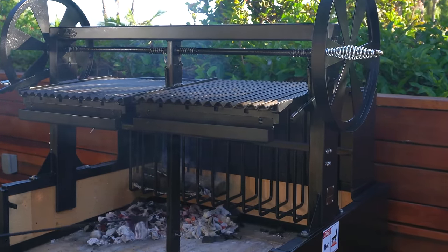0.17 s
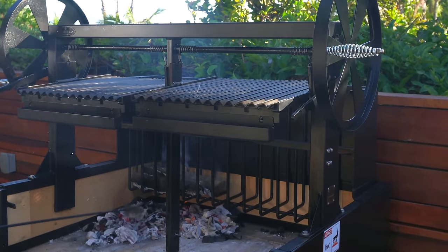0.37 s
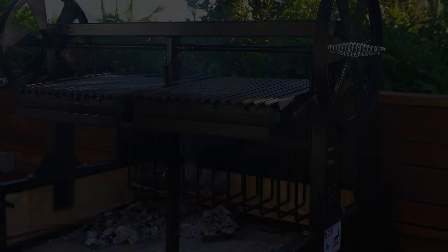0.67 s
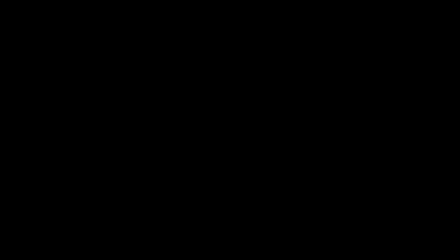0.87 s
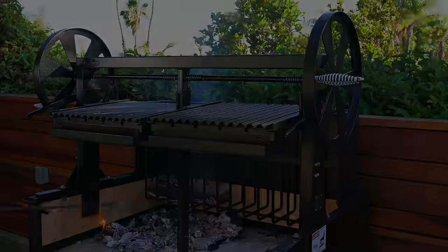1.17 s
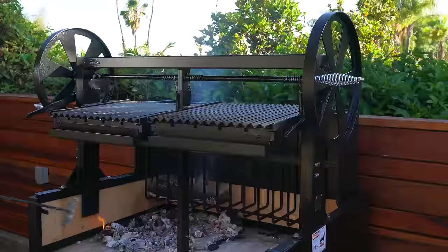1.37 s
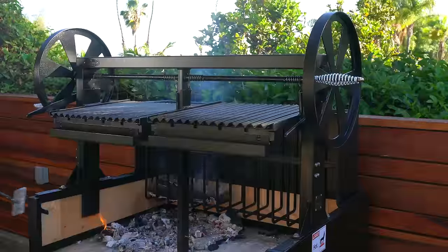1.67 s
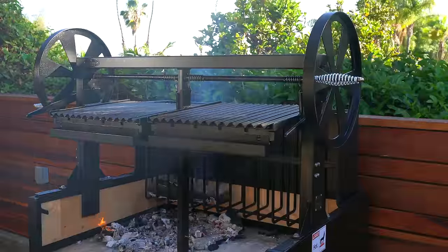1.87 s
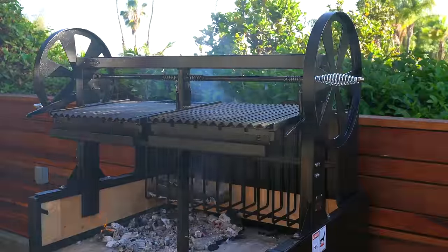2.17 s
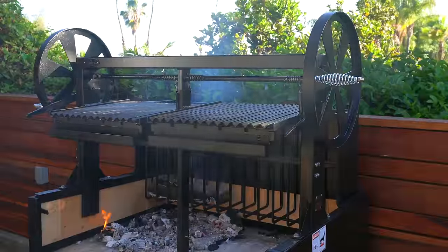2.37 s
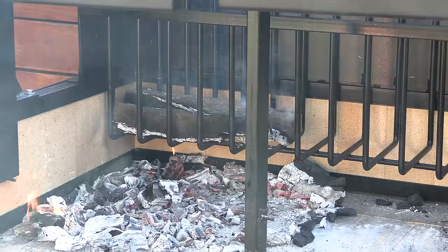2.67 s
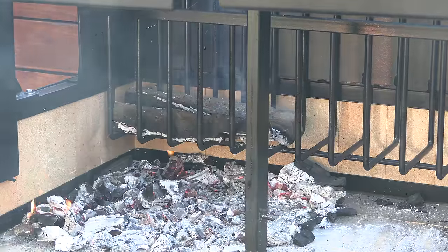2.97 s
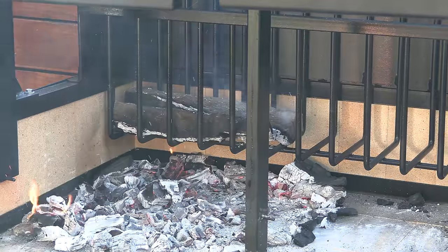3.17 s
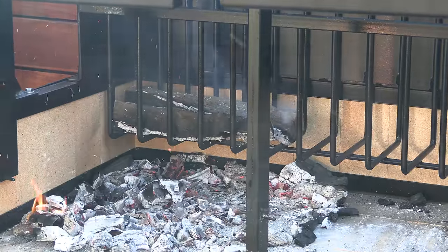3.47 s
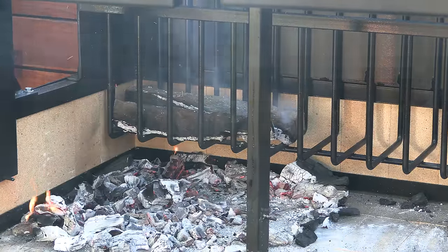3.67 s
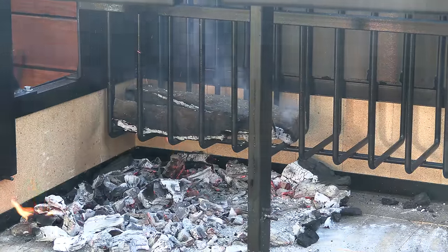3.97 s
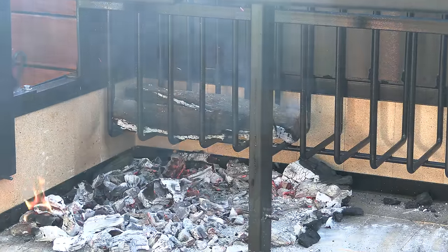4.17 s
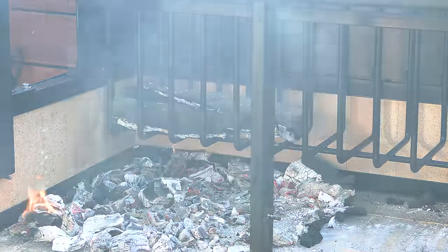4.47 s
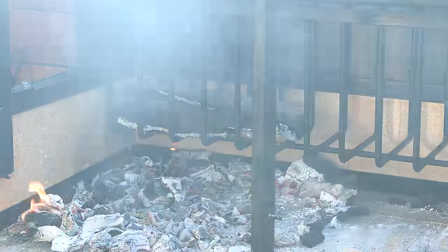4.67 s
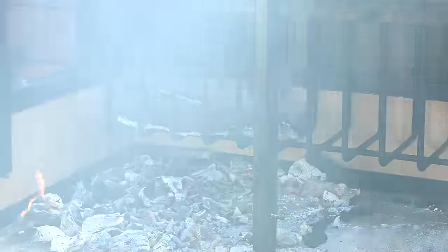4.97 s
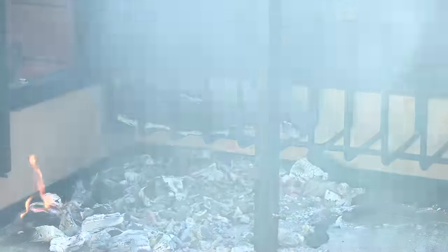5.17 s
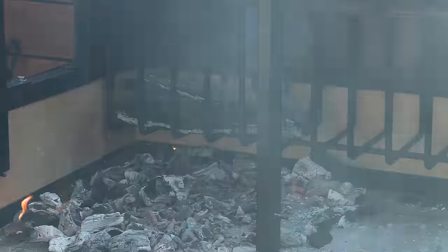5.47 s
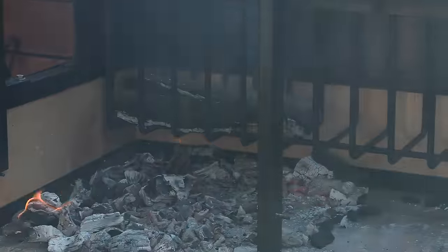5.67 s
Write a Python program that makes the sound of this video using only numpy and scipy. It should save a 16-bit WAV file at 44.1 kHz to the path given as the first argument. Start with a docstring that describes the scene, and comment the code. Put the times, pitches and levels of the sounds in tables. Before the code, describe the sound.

Embers crackle over a quiet outdoor rush and faint low hum. Within the first second a rake grinds through coals, clinks and thuds on sheet steel. A calmer stretch of snaps follows, then low wind puffs, a crunch and the loudest boomy metal clatter with short squeaks. Gas hisses softly, embers pop sharply, and steel knocks again near the end. Close microphone, short patio reflections.

```python
"""Raking a charcoal grill

A metal rake is drawn through burning lump charcoal in an outdoor steel grill: decaying modes clink and knock.
Shaped random clicks make the grinding coals, sizzle and sputter; noise bursts make the snapping embers.
Low noise swells buffet the microphone as a gust; band noise gives a rush and faint hum, gliding sines a far bird."""
import sys
import numpy as np
from scipy import signal
from scipy.fft import rfft, irfft
from scipy.io import wavfile

SR = 44100
rng = np.random.default_rng(int(sys.argv[2]) if len(sys.argv) > 2 else 0)


def dump_mix(stems):
    """Bounce the given channels to the path in sys.argv[1] as a 16-bit WAV at rate SR."""
    frames = np.atleast_2d(stems).T  # one column per channel
    limited = np.clip(frames, -1, 1)  # hard clip at full scale
    pcm = np.round(limited * 32767).astype(np.int16)
    wavfile.write(sys.argv[1], SR, pcm)


N = 256220
TIME = np.arange(N) / SR
TAIL = TIME[:int(.8 * SR)]   # time axis of one decaying sound
EDGES = 22 * 2 ** (np.arange(20) / 2)   # half-octave band edges, Hz
CENTRES = np.sqrt(EDGES[1:] * EDGES[:-1])

# modes of the grill's bars: mode_hz [Hz], level_db [dB, relative], t60_s [s, before the length factor]
BAR_MODES = [(1200, -2.5, 0.22), (1376, 5, 0.094), (2233, 2, 0.073), (2450, -14, 0.24), (2900, -8, 0.45),
             (2940, 2, 0.12), (3590, -3.5, 0.44), (4230, -18, .25), (4340, -5, 0.31), (4970, -21, 0.57),
             (5080, -8, 0.65), (6060, 1, 0.14), (6210, -16, 0.4), (6950, -9, 0.22), (7420, -15, 0.33),
             (7870, -14, 0.16), (9000, -3, 0.1), (9512, -11, 0.19), (11820, -3.5, 0.085)]


def from_db(db):
    """Decibels to gain."""
    return 10 ** (np.asarray(db) / 20)


def rms_one(x):
    """Scale to unit rms."""
    return x / np.sqrt(np.mean(x ** 2) + 1e-20)


def in_time(rows):
    """Interpolate each column of a breakpoint curve at every sample."""
    s, *columns = np.transpose(rows)
    return [np.interp(TIME, s, column) for column in columns]


def at_hz(points, hz):
    """Read a table on a log-frequency axis."""
    known, value = np.transpose(points)
    return np.interp(np.log(hz), np.log(known), value)


def add(out, s, sound):
    """Mix a sound in at time s."""
    at = max(round(s * SR), 0)
    out[at:at + len(sound)] += sound[:N - at]


def butter(x, hz, kind, order=2):
    """Causal Butterworth filter."""
    sos = signal.butter(order, np.minimum(hz, .48 * SR), kind, fs=SR, output="sos")
    return signal.sosfilt(sos, x + 1e-18)


def drift(rate):
    """Random wander of unit rms, with rate new values per second joined by lines."""
    knots = rng.standard_normal(2048)
    return rms_one(np.interp(TIME * rate, np.arange(len(knots)), knots))


def bands(x):
    """Split into half-octave bands, each of rms 1."""
    return np.array([rms_one(butter(x, [low, high], "band")) for low, high in zip(EDGES, EDGES[1:])])


def coloured(x, spectrum):
    """Filter by a curve of (Hz, dB) that falls away beyond its ends; rms 1."""
    hz = np.maximum(np.fft.rfftfreq(N, 1 / SR), 1)
    low_end = 1 + (spectrum[0][0] / 2 / hz) ** 4
    high_end = 1 + (hz / spectrum[-1][0] / 2) ** 4
    gain = from_db(at_hz(spectrum, hz)) / np.sqrt(low_end * high_end)
    return rms_one(irfft(rfft(x) * gain, N))


def grains(per_s, spread_db):
    """Random clicks of either sign, many small and a few large; rms 1."""
    sizes_db = spread_db * np.minimum(rng.exponential(1, N), 4)
    sizes = from_db(sizes_db) * rng.choice([-1, 1], N)
    return rms_one(sizes * (rng.random(N) < per_s / SR))


def dying(t60):
    """Envelopes that fall 60 dB in t60 seconds, one row each."""
    return np.exp(-np.log(1000) * TAIL / np.reshape(t60, (-1, 1)))


def sines(hz):
    """Unit sines of random phase, one row each."""
    return np.sin(2 * np.pi * (np.outer(hz, TAIL) + rng.random((len(hz), 1))))


def swells(rows, attack_s, t60):
    """Gain over time: each (start s, hold s, dB) rises, holds and dies away."""
    total = 0
    for s, hold, db, *_ in rows:
        fall_db = 60 * np.maximum(TIME - s - attack_s - hold, 0) / t60
        total = total + from_db(db - fall_db) * np.clip((TIME - s) / attack_s, 0, 1)
    return total


def strike(modes, level_db, tilt_db=0, vary_db=4.5, length=1):
    """Ring a metal part as dying modes; each touch weights them a little differently."""
    hz, mode_db, t60 = np.transpose(modes)
    tilt = tilt_db * np.log2(hz / np.median(hz))
    gain = from_db(level_db + mode_db + tilt + vary_db * rng.standard_normal(len(hz)))
    return gain @ (sines(hz) * dying(length * t60))


def warble(notes, waver, waver_rate):
    """Short gliding notes whose pitch wavers fast."""
    out = np.zeros(N)
    for s, length, start_hz, end_hz, level_db in notes:
        count = int(length * SR)
        pitch = np.linspace(start_hz, end_hz, count) * (1 + waver * drift(waver_rate)[:count])
        tone = np.sqrt(2) * np.sin(2 * np.pi * np.cumsum(pitch) / SR)
        add(out, s, from_db(level_db) * np.hanning(count) * tone)
    return out


def scatter(x, early_db, early_t60, late_db, late_t60):
    """Close walls scatter each sound from 2 ms on; the patio adds a longer tail, both of dying noise."""
    early, late = rng.standard_normal((2, len(TAIL))) * dying([early_t60, late_t60]) * (TAIL > .002)
    early_echo = from_db(early_db) * early / np.linalg.norm(early)
    late_echo = from_db(late_db) * late / np.linalg.norm(late)
    return x + signal.fftconvolve(x, early_echo + late_echo)[:N]


def dips(x, rows):
    """Carve broad shallow dips by taking away part of a band."""
    for hz, width_hz, depth_db in rows:
        edges = [max(hz - width_hz / 2, 20), hz + width_hz / 2]
        x = x - (1 - from_db(depth_db)) * butter(x, edges, "band", order=1)
    return x


def outdoors(hum_width_hz=9):
    """A distant rush of shaped noise that barely drifts, with a wavering low hum of narrow noise bands."""
    # rush spectrum: band_hz [Hz], density_db [dB per Hz, relative]
    air_colour = [(28, -1.5), (45, -3), (80, -0.5), (115, -2), (168, -7.5), (240, -8.5), (330, -11.5),
                  (550, -13), (740, -11), (1100, -18.5), (1700, -26.5), (2900, -36.5), (3600, -40),
                  (6000, -45)]
    # hum bands: centre_hz [Hz], level_db [dB, relative]
    hum_bands = [(68, -26), (113, -4.5)]
    # hum level: time_s [s], level_db [dB]
    hum_level = [(0, -59), (1.3, -56.5), (2.2, -61.5), (2.6, -52.5), (3.0, -51.5), (4.2, -79), (5.8, -60)]
    air = from_db(-49.5 + .5 * drift(4.29)) * coloured(rng.standard_normal(N), air_colour)
    hum = np.zeros(N)
    for hz, db in hum_bands:
        edges = [hz - hum_width_hz / 2, hz + hum_width_hz / 2]
        hum += from_db(db) * rms_one(butter(rng.standard_normal(N), edges, "band", order=1))
    return air + from_db(in_time(hum_level)[0]) * rms_one(hum)


def bird(call_db=2, note_s=0.055, pitch_drop=0.046):
    """Far, buzzy notes: each falls by a share of its pitch, wavers fast, and is blurred by the garden."""
    # notes: start_s [s], pitch_hz [Hz, before the fall and waver], level_db [dB, before the call gain]
    chirps = [(1.896, 2810, -67.5), (2.09, 4270, -67), (2.139, 3630, -67.5), (2.945, 4220, -71),
              (2.994, 3720, -71), (4.102, 4150, -73), (4.129, 3460, -65)]
    notes = [(s, note_s, hz, hz * (1 - pitch_drop), db) for s, hz, db in chirps]
    call = warble(notes, waver=0.047, waver_rate=248)
    return from_db(call_db) * scatter(call, early_db=-9, early_t60=0.041, late_db=1.5, late_t60=0.21)


def gust(lowest_hz=42, attack_s=0.023, t60=0.17):
    """Eddies at the microphone port, puff by puff: low noise whose upper edge moves with each puff."""
    # puffs of wind: start_s [s], hold_s [s], level_db [dB], upper_edge_hz [Hz]
    puffs = [(2.949, .01, -37, 188), (3.022, 0.049, -32, 126), (3.124, 0.053, -36.5, 158),
             (3.228, 0.009, -35.5, 175), (3.325, 0.04, -32.5, 120), (3.396, 0.019, -31.5, 120),
             (3.429, 0.017, -36.5, 210)]
    edge_hz, = in_time([(s + attack_s + hold / 2, hz) for s, hold, _, hz in puffs])
    low = CENTRES[:10, None]
    weights = 1 / np.sqrt((1 + (low / edge_hz) ** 9) * (1 + (lowest_hz / low) ** 6))
    eddies = (weights * bands(rng.standard_normal(N))[:10]).sum(axis=0)
    eddies = eddies / np.linalg.norm(weights, axis=0)   # level stays even as the edge moves
    return swells(puffs, attack_s, t60) * rms_one(eddies)


def sizzle(hiss_db=-4, ticks_db=-5):
    """The glowing bed hisses in dense fine clicks and ticks in sparse ones."""
    # sizzle level: time_s [s], level_db [dB]
    bed_level = [(0, -63.5), (1.1, -65), (1.65, -65.5), (2.1, -66.5), (2.65, -74.5), (3.7, -66), (4.7, -68),
                 (5.05, -59), (5.3, -68.5), (5.8, -65.5)]
    # sizzle spectrum: band_hz [Hz], density_db [dB per Hz, relative]
    bed_colour = [(1500, 3.5), (3000, 0.5), (5000, -3), (8000, -4), (12500, 0), (16000, 1.5)]
    hiss = from_db(hiss_db) * grains(per_s=11000, spread_db=5.0)
    ticks = from_db(ticks_db) * grains(per_s=110, spread_db=3.5)
    return from_db(in_time(bed_level)[0]) * coloured(hiss + ticks, bed_colour)


def sputter(seep_db=-77):
    """Jets of gas spit finely out of the wood in the middle treble, over a faint steady seep."""
    # jets: start_s [s], hold_s [s], level_db [dB]
    jets = [(2.8, 0.062, -60.5), (4.41, 0.13, -62), (4.92, 0.039, -59)]
    # spitting spectrum: band_hz [Hz], density_db [dB per Hz, relative]
    spit_colour = [(1500, 6), (2150, 3), (2900, -3), (4100, -6), (5200, -8), (8000, -10)]
    flow = from_db(seep_db) + swells(jets, attack_s=0.011, t60=.7)
    return flow * coloured(grains(per_s=5400, spread_db=3.0), spit_colour)


def snaps(crack_db=-2, top_gain_db=2.5, body_gain_db=2, linger_db=-17, linger=5, build_s=0.00084):
    """An ember splits: one sharp crack, a short spray of splinters, and a faint lingering fizz."""
    # louder embers: start_s [s], splinter_db and woody_body_db [dB, before the gains],
    # t60_s [s, before the fast and slow factors]
    embers = [(0.169, -42.5, -51, 0.06), (0.2199, -45, -64, 0.039), (0.336, -45, -57, .025),
              (0.3994, -51.5, -60, 0.054), (0.4535, -53, -59, .03), (0.5084, -40, -49, 0.028),
              (0.6, -57, -74, .04), (0.9004, -52, -68, .022), (1.0024, -53, -60, .027),
              (1.2293, -48.5, -50, 0.042), (1.3019, -51, -60, 0.026), (1.3858, -63, -51, 0.017),
              (1.515, -48, -62, 0.018), (1.5462, -43, -46, .02), (1.7521, -43, -50.5, 0.072),
              (1.844, -53.5, -58.5, 0.073), (1.8956, -56, -53, 0.027), (2.188, -55.5, -73, .04),
              (2.3572, -52, -61, 0.066), (2.4754, -59, -77, .035), (2.5638, -58.5, -75, .04),
              (2.671, -57.5, -62, .04), (2.811, -64, -63, 0.091), (3.0838, -58.5, -63, 0.16),
              (3.3447, -50, -57, 0.062), (3.409, -55, -56, 0.22), (3.5914, -46, -47.5, 0.084),
              (4.027, -56.5, -72, 0.12), (4.175, -53.5, -71, 0.071), (4.2587, -51.5, -56.5, 0.055),
              (4.4221, -54, -48, 0.039), (4.619, -53, -63, 0.06), (4.819, -44, -52, 0.044),
              (4.9194, -46.5, -55, 0.032), (5.01, -63, -42.5, 0.023), (5.1033, -47, -57, 0.036),
              (5.151, -47, -54, 0.023), (5.2036, -38, -49, 0.064), (5.463, -55, -70, .035),
              (5.5199, -53.5, -65, .04), (5.6058, -54.5, -55.5, 0.043), (5.7908, -46, -70, 0.022)]
    crack, top, body = np.zeros((3, N))
    for s, top_db, body_db, t60 in embers:
        fast, slow = dying(max(t60, .01) * np.array([.7, linger]))
        spray = (fast + from_db(linger_db) * slow) * np.minimum(TAIL / build_s, 1)
        add(crack, s, from_db(max(top_db, body_db) + crack_db) * dying(.007)[0])
        add(top, s, from_db(top_db + top_gain_db) * spray)
        add(body, s, from_db(body_db + body_gain_db) * spray)
    splinter_colour = [(4000, -4.5), (8000, -0.5), (12500, 4), (16000, 1), (20000, -25)]
    fibre_colour = [(1000, 7.5), (2000, 2.0), (4200, 7.0), (7000, -4), (12000, -17)]
    splinters = coloured(rng.standard_normal(N), splinter_colour)
    fibres = coloured(rng.standard_normal(N), fibre_colour)
    bright = butter(crack * rng.standard_normal(N) + top * splinters, 1500, "high")
    return bright + body * fibres


def coals(lump_t60=0.045, clink_db=-3):
    """Brittle lumps grind and clink under the rake, or settle with a short crunch."""
    # strokes through the coals: start_s [s], hold_s [s], level_db [dB]
    drag_strokes = [(0.125, .01, -54), (0.17, 0.034, -45), (0.255, 0.012, -49.5)]
    # grinding spectrum: band_hz [Hz], density_db [dB per Hz, relative]
    drag_colour = [(150, -6), (350, 6.5), (700, -7.5), (1500, -3), (2600, -14), (4000, -6), (8000, -14.5),
                   (14000, -10.5)]
    # lumps that shift and settle: start_s [s], level_db [dB]
    settling_lumps = [(0.22, -38.5), (0.264, -44), (0.346, -41.5), (1.752, -45), (1.894, -41.5),
                      (3.353, -30.5), (5.202, -34.5)]
    # crunch spectrum: band_hz [Hz], density_db [dB per Hz, relative]
    crunch_colour = [(150, 6.5), (450, 0.5), (800, -7), (1400, -8.5), (2200, -6.5), (5000, -39),
                     (14000, -18)]
    pitches = np.geomspace(450, 4500, num=10)
    clinking = np.zeros(N)
    # each size of lump has its own pitch and falls 60 dB in 25 cycles
    for ring in sines(pitches) * dying(25 / pitches):
        clinking += signal.fftconvolve(grains(per_s=88, spread_db=6.5), ring)[:N]
    grit = grains(per_s=2200, spread_db=1.0)
    grinding = coloured(grit + from_db(clink_db) * rms_one(clinking), drag_colour)
    drag = swells(drag_strokes, attack_s=0.0061, t60=0.49) * grinding
    settling = np.zeros(N)
    for s, level_db in settling_lumps:
        add(settling, s, from_db(level_db) * dying(lump_t60)[0])
    return drag + settling * coloured(grains(per_s=18000, spread_db=4.5), crunch_colour)


def skid(grit_db=-7):
    """Many tiny slips excite the bars, which the pressing rake damps."""
    # skids along the bars: start_s [s], hold_s [s], level_db [dB]
    skid_strokes = [(3.606, 0.013, -43.5), (3.748, 0.043, -39.5), (3.818, 0.011, -41.5)]
    # skid filter: band_hz [Hz], gain_db [dB, relative]
    skid_colour = [(1000, 7.5), (1300, -5), (2300, 2), (3500, -8), (6000, -5), (9000, -10.5), (13000, -14)]
    slips = grains(per_s=770, spread_db=2.0)
    ringing = rms_one(signal.fftconvolve(slips, strike(BAR_MODES, 0, length=0.12))[:N])
    scrape = coloured(ringing + from_db(grit_db) * slips, skid_colour)
    return swells(skid_strokes, attack_s=0.0072, t60=0.25) * scrape


def squeaks():
    """Steel sticks and slips in short squeaks, made as gliding tones of unsteady pitch."""
    # squeaks: start_s [s], length_s [s], start_hz and end_hz [Hz, before the waver], level_db [dB]
    slips = [(3.812, .02, 4120, 3970, -44), (3.828, 0.046, 2480, 2370, -48),
             (3.895, 0.035, 2355, 2370, -47.5), (3.935, 0.03, 2420, 2430, -60)]
    return warble(slips, waver=0.076, waver_rate=350)


def clinks(landed_t60=.06):
    """Head, tine and shaft of the rake, and the bars that it touches, ring in their own modes."""
    # rake head touches: start_s [s], head_db [dB], tilt_db [dB per octave],
    # tine_db [dB, the long-ringing tine], length [factor on the head's t60]
    head_hits = [(0.259, -55, 0, -78, 0.63), (0.322, -53.5, -5, -78, 1), (0.669, -41.5, -2, -50, 0.6),
                 (0.686, -47, 3.5, -40.5, 0.52), (0.92, -43.5, 0, -80, 0.44), (1.17, -52.5, -2.5, -71, .75)]
    # head modes: mode_hz [Hz], level_db [dB, relative], t60_s [s, before the length factor]
    head_modes = [(1510, -4, 0.13), (2040, -10.5, 0.16), (2830, -20, .14), (3750, 1.5, 0.11),
                  (3820, -1.5, 0.77), (3960, -19, .13), (5850, 0, 0.05), (3900, -4.5, 0.18),
                  (6010, -5, 0.085), (6970, -11.5, 0.41), (8900, -7, 0.32), (9300, -5, .18),
                  (9600, -6.5, 0.28), (11320, -11, .17), (11830, -7, 0.2), (12450, -2, .15),
                  (13500, -5, .09)]
    # tine mode: mode_hz [Hz], level_db [dB, relative], t60_s [s, until the rake lands]
    tine_modes = [(4447, 0, .42)]
    # shaft strikes: start_s [s], level_db [dB]
    shaft_hits = [(0.757, -30.5)]
    # shaft modes: mode_hz [Hz], level_db [dB, relative], t60_s [s, before the length factor]
    shaft_modes = [(1314, -4.5, 0.29), (1735, -3.5, 0.25), (2320, -5, 0.17), (3120, 0, 0.11),
                   (3730, -6, 0.13), (3742, -3, 0.12), (4255, -6, 0.11), (4990, -12.5, 0.073),
                   (5735, 1, 0.066), (6366, -5, 0.073), (7190, -10, 0.084), (9190, -4.5, 0.056),
                   (10300, -7, 0.031), (11900, -7, 0.039), (12200, -13, .06), (15100, -12, 0.054)]
    # rattles on the bars: start_s [s], level_db [dB], tilt_db [dB per octave]
    bar_hits = [(3.345, -52.5, -1.5), (3.614, -54, -7.5), (3.637, -62, -6), (3.669, -58, -4.5),
                (3.752, -44, 0), (3.784, -44, 6), (3.831, -49.5, 3)]
    out = np.zeros(N)
    landing = shaft_hits[0][0]
    for s, head_db, tilt_db, tine_db, length in head_hits:
        # a tine that is still ringing is stopped when the rake lands
        pressed = np.maximum(TAIL + s - landing, 0) * (s < landing)
        damping = np.exp(-np.log(1000) * pressed / landed_t60)
        head = strike(head_modes, head_db, tilt_db, vary_db=1, length=length)
        add(out, s, head + strike(tine_modes, tine_db) * damping)
    for s, level_db in shaft_hits:
        add(out, s, strike(shaft_modes, level_db, vary_db=3, length=0.99))
    for s, level_db, tilt_db in bar_hits:
        add(out, s, strike(BAR_MODES, level_db, tilt_db, vary_db=2.5, length=0.81))
    return out


def knock_gain(hz, boom_db, boom_hz, crash_db, crash_hz):
    """How strongly a knock excites each frequency: a rounded boom and a crash with a steep top."""
    boom = from_db(boom_db - 7 * np.log2(hz / boom_hz) ** 2)   # falls away on both sides
    octaves = np.log2(hz / crash_hz)
    # 5.5 dB per octave up to the crash's pitch, 31 dB per octave down above it
    crash = from_db(crash_db + np.minimum(5.5 * octaves, -31 * octaves))
    return np.hypot(boom, crash)


def steel_floor(lowest_hz=215, wash_db=0.0, clear_db=-3.0, bass_fall_db=8):
    """A knock spreads through the sheet: a few clear modes in a wash of crowded ones, the highs dying first."""
    # knocks; the sheet booms and the contact crashes, higher when it is harder: start_s [s], swell_s [s],
    # length [factor on t60], boom_db [dB], boom_hz [Hz], crash_db [dB], crash_hz [Hz]
    knocks = [ (0.168, .001, 0.5, -42.5, 310, -44, 2400), (0.668, .002, .74, -46.5, 360, -57, 7500),
              (0.757, 0.021, 0.91, -26.5, 356, -34, 9000), (0.919, 0.0033, 0.45, -43, 386, -34, 7200),
              (1.039, 0.0046, 1.12, -36.5, 930, -26.5, 3940), (3.344, 0.0011, 1, -51, 560, -41, 3970),
              (3.739, 0.00088, 0.73, -21.5, 583, -23.5, 1890), (3.746, 0.0031, 0.16, -7.5, 665, -50, 6000),
              (3.783, 0.0012, .78, -27, 544, -40, 5600), (3.829, 0.0022, 0.38, -18, 600, -46, 6300),
              (3.855, 0.0068, 0.64, -21, 610, -39, 2900), (5.644, 0.0009, 1.6, -33.5, 650, -38.5, 3250),
              (5.658, 0.0039, 0.77, -21.5, 330, -21, 4140), (5.678, 0.00095, 0.93, -30.5, 487, -48, 4000)]
    # clear modes: mode_hz [Hz], level_db [dB, relative]
    floor_modes = [(226, -4), (300, -34), (334, -17.5), (396, -5.5), (452, -6), (506, -6), (576, -2.5),
                   (620, -6), (675, -3), (716, -3.5), (782, 0), (850, -5), (926, -6), (1163, -0.5),
                   (1244, -12), (1350, 1.5), (1430, -2), (1560, 0.5), (1834, -2), (1930, -5.5), (2008, -7),
                   (2137, -11.5), (2480, -6), (2830, -3), (3590, -25), (3790, -3.5), (4050, -6), (4330, -3)]
    # decay of the sheet: band_hz [Hz], t60_s [s, before the length factor]
    floor_t60 = [(120, 0.54), (300, 0.59), (700, 0.42), (1400, 0.2), (2600, 0.19), (5000, 0.086),
                 (14000, 0.045)]
    # broad shallow dips that soften parts of the knocks' spectrum:
    # centre_hz [Hz], width_hz [Hz], depth_db [dB]
    floor_dips = [(972, 89, -5.5), (2910, 1300, -3), (7340, 4100, -6)]
    out, noise = np.zeros(N), bands(rng.standard_normal(N))
    hz, mode_db = np.transpose(floor_modes)
    bass_db = -bass_fall_db * np.maximum(np.log2(lowest_hz / CENTRES), 0)
    for k, (s, swell, length, *blow) in enumerate(knocks):
        start = k * len(TAIL) // 4   # each knock reads its own stretch of noise
        stretch = noise[:, start:start + len(TAIL)]
        wash_gain = knock_gain(CENTRES, *blow) * from_db(bass_db + wash_db)
        wash = wash_gain @ (stretch * dying(length * at_hz(floor_t60, CENTRES)))
        clear_gain = knock_gain(hz, *blow) * from_db(mode_db + clear_db)
        clear = clear_gain @ (sines(hz) * dying(length * at_hz(floor_t60, hz)))
        add(out, s, (wash + clear) * np.minimum(TAIL / swell, 1))
    return dips(out, floor_dips)


def scene():
    """The grill in front, the garden behind."""
    behind = outdoors() + bird() + gust()
    embers = sizzle() + sputter() + snaps() + coals() + skid()
    fire = scatter(embers, early_db=-12.5, early_t60=0.0074, late_db=-12.5, late_t60=0.12)
    metal = scatter(squeaks() + clinks(), early_db=-5, early_t60=0.14, late_db=-21.0, late_t60=0.3)
    return (behind + fire + metal + steel_floor())[None]


def record(dry):
    """A steep elliptic low-pass cuts the top above 16.2 kHz."""
    return signal.sosfilt(signal.ellip(10, .1, 80, 16200, fs=SR, output="sos"), dry)


dry = scene()
out = record(dry)
dump_mix(out)
```